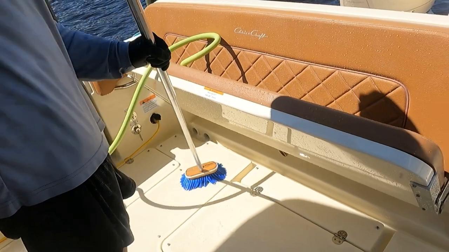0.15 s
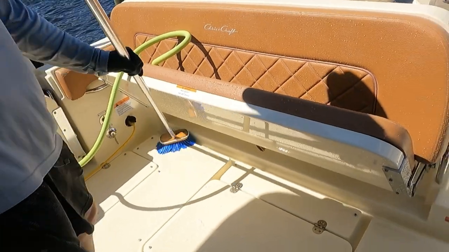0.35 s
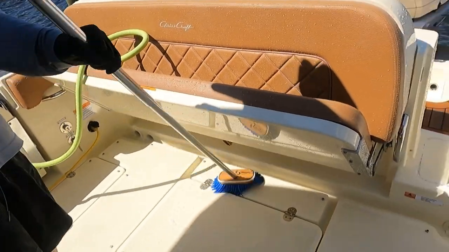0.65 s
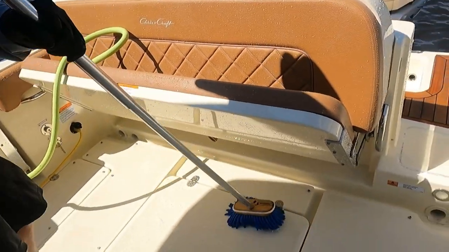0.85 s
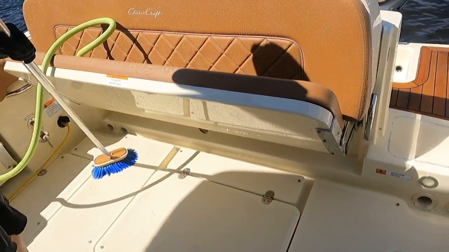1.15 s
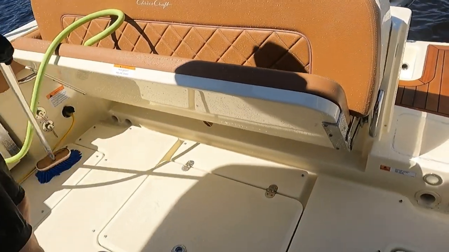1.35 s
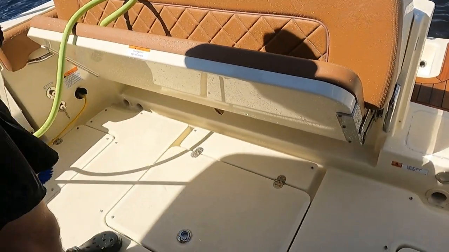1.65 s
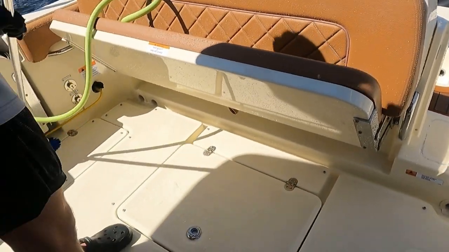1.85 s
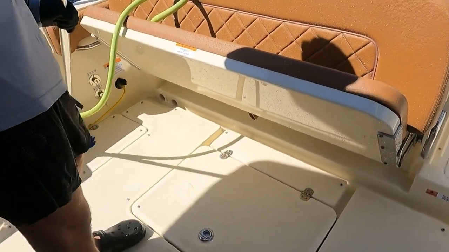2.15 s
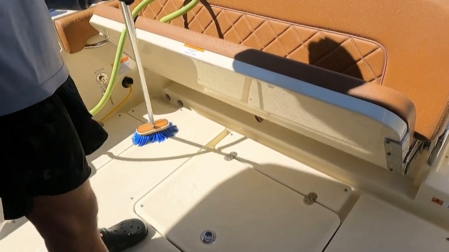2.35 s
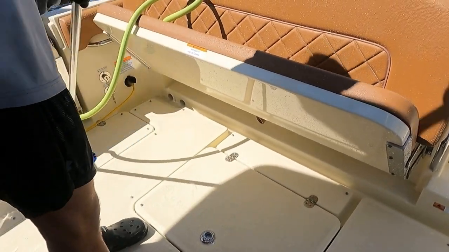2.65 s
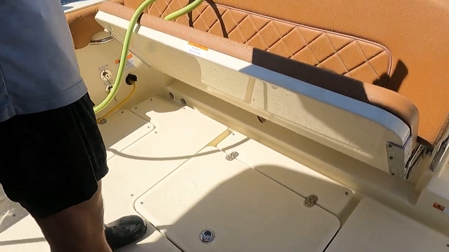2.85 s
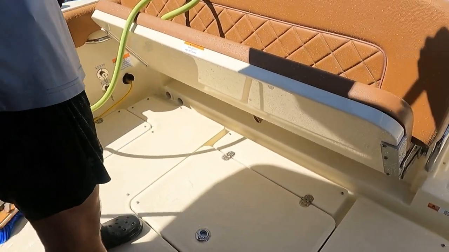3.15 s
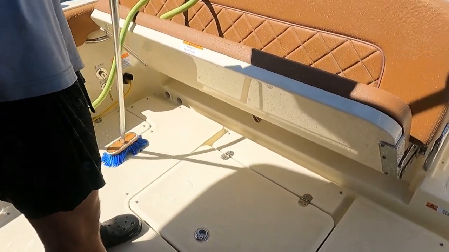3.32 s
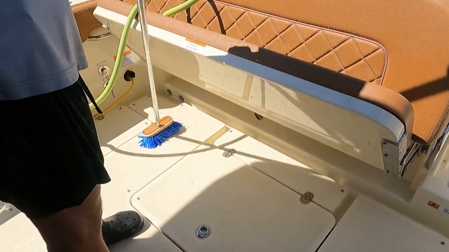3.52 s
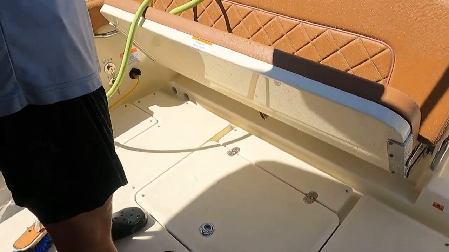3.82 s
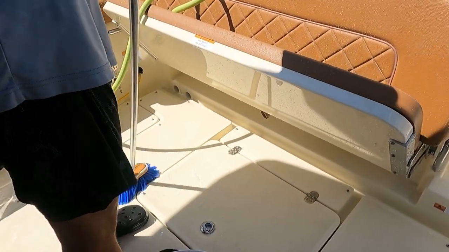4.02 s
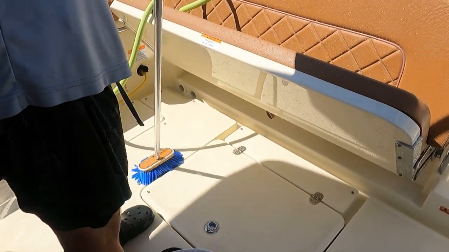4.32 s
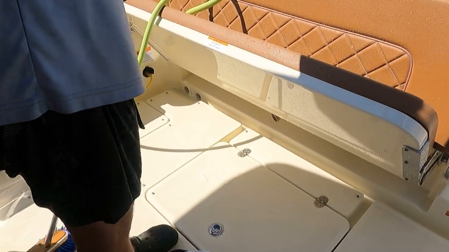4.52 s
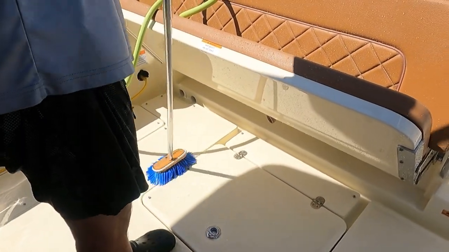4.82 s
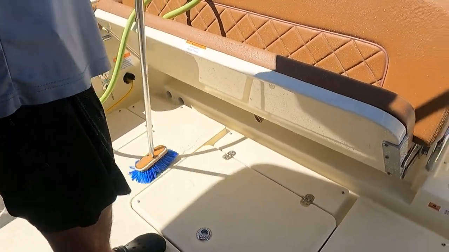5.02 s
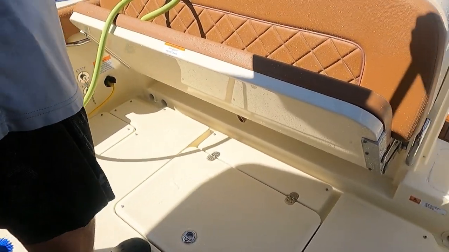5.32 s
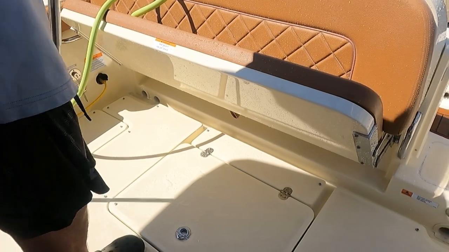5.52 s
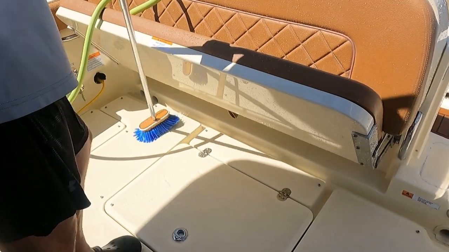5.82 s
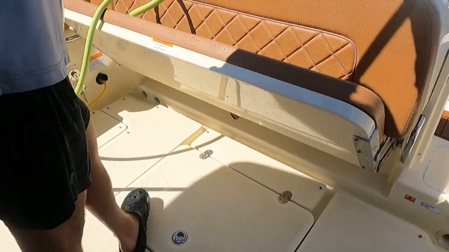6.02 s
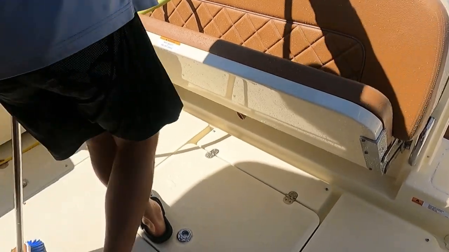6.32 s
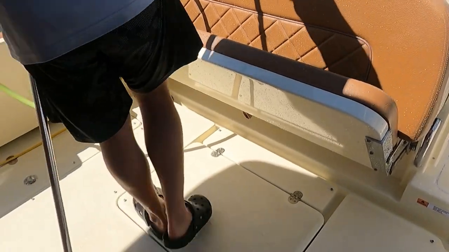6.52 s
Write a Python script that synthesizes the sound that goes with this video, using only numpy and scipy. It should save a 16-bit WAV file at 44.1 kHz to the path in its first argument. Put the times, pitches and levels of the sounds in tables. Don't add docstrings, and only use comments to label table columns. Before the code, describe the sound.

A soft brush scrubs back and forth over a ridged boat deck, hissing and faintly singing, with a hard hull knock and a later clatter.

```python
import sys
import numpy as np
from scipy import signal
from scipy.fft import rfft, irfft, next_fast_len
from scipy.io import wavfile
from scipy.ndimage import uniform_filter1d

SR = 44100
rng = np.random.default_rng(int(sys.argv[2]) if len(sys.argv) > 2 else 0)


def gain_from_db(level_db):
    decades = np.asarray(level_db, float) / 20
    return 10 ** decades


def to_wav(s):
    ch = np.atleast_2d(s).T
    pcm = np.round(np.clip(ch, -1, 1) * 32767)
    wavfile.write(sys.argv[1], SR, pcm.astype(np.int16))


N = 294147

# fastest moment in seconds, speeding up in seconds, slowing down in
# seconds, ridges crossed per second in Hz, tone level in dB.
RIDGE_STROKES = [(0.121, 0.19, 0.17, 1170, -51), (.23, 0.099, 0.35, 857, -44.5),
                 (.615, 0.068, 0.066, 704, -44.5), (1.075, 0.235, 0.21, 949, -44),
                 (3.3, .26, 0.22, 1118, -48.5), (3.69, 0.18, 0.18, 1110, -44),
                 (4.05, 0.15, 0.23, 963, -42.5), (4.43, 0.16, 0.18, 1091, -41.5),
                 (4.765, 0.14, 0.23, 1039, -41.5), (5.16, .18, 0.2, 1035, -41),
                 (5.63, 0.21, 0.24, 1088, -42), (5.99, 0.18, 0.23, 974, -47.5),
                 (6.42, 0.21, 0.15, 812, -55), (2.33, .2, 0.054, 1140, -52), (2.72, 0.19, 0.33, 1086, -53),
                 (.67, .2, 0.19, 1138, -47.5), (2.7, .2, 0.24, 1368, -52.5)]
ARM_SWINGS = [(2.4, 2.4, 1), (2.4, 2.4, 1), (2.4, 2.4, 1), (2.2, 4.5, .5), (3.4, 3, .6), (2.4, 2.4, 1),
              (2.4, 2.4, .9), (2.4, 3, 1.1), (2.4, 2.4, .9), (2.4, 2.4, 1.1), (2.4, 2.4, .75),
              (2.4, 2.4, 1.5), (2.4, 2.4, 1), (2.4, 2.4, 1), (2.4, 2.4, 1), (2.4, 2.4, 1), (2.4, 2.4, 1)]


def evened(x):
    return x / np.sqrt(np.mean(x ** 2) + 1e-20)


def read(points, hz):
    f, value = np.transpose(points)
    return np.interp(np.log(hz + 1), np.log(f + 1), value)


def add(mix, s, sound):
    part = mix[round(s * SR):][:len(sound)]
    part += sound[:len(part)]


def drift(count, span):
    wide = max(int(span), 1)
    wander = uniform_filter1d(rng.standard_normal(count), wide)
    return evened(uniform_filter1d(wander, wide))


def resonate(x, hz, width):
    turn = np.exp(2j * np.pi * hz * np.arange(len(x)) / SR)
    r = np.exp(-np.pi * width / SR)
    return 2 * (turn * signal.lfilter([1 - r], [1, -r], x / turn)).real


def coloured(x, points):
    size = next_fast_len(len(x))
    gain = gain_from_db(read(points, np.fft.rfftfreq(size, 1 / SR)))
    return evened(irfft(rfft(x, size) * gain, size)[:len(x)])


def speed(t, fastest, speeding, slowing, square):
    length = np.where(t < fastest, speeding, slowing)
    return np.maximum(1 - abs((t - fastest) / length) ** square, 0)


def comb(hz, t):
    *swing, top_hz, db = np.transpose(RIDGE_STROKES)[:, :, None]
    early_square, late_square = np.transpose(ARM_SWINGS)[:2, :, None]
    pace = speed(t, *swing, np.where(t < swing[0], early_square, late_square))
    firm = np.clip((pace - .65) / .25, 0, 1) * np.clip((db + 54) / 9, 0, 1)
    best = firm.argmax(0), np.arange(len(t))
    order = np.maximum(hz[:, None] / np.maximum((top_hz * pace)[best], 300), .5)
    under_db = -3.5 * np.clip(4 - 5 * order, 0, 1)
    reach = np.clip(np.minimum(hz / 300 - 1, 2 - 1.46 * hz / 3400), 0, 1)
    return firm[best] * (3.5 * np.cos(2 * np.pi * order) + under_db) * reach[:, None]


def hiss(spread_db=1.5, patchy_db=1.5, flicker_db=0.5):
    # fastest moment in seconds, speeding up in seconds, slowing down in seconds, bristle hiss in dB,
    # deck boom relative to it in dB.
    strokes = [(.15, 0.45, 0.19, -39.5, 3), (.33, 0.2, 0.092, -41, 2), (0.631, 0.19, 0.21, -40, -3.5),
               (1.1, 0.3, 0.24, -40, 0), (1.33, 0.072, 0.066, -51.5, 5), (1.481, 0.14, 0.11, -46, 0),
               (1.76, 0.15, 0.11, -45.5, 3.5), (2.005, 0.01, 0.013, -66, -10),
               (2.11, 0.031, 0.027, -56.5, 10), (2.25, 0.09, 0.12, -46.5, -2),
               (2.41, 0.12, 0.057, -44.5, -1), (2.53, 0.081, 0.031, -52.5, -2),
               (2.732, 0.17, 0.19, -41.5, -5), (2.97, 0.19, 0.17, -53.5, 2.5),
               (3.23, 0.21, 0.28, -42.5, -8), (3.42, 0.073, 0.062, -41.5, -2),
               (3.67, 0.18, 0.21, -40.5, -2), (4.07, .19, 0.17, -39, 0.5), (4.44, 0.17, 0.17, -40, -1),
               (4.791, 0.18, .2, -39.5, 2), (5.16, 0.17, 0.23, -41, 1), (5.64, 0.26, 0.29, -41, -3.5),
               (5.99, 0.15, 0.29, -43, -5), (6.442, 0.26, 0.18, -45.5, -1), (6.72, 0.12, .1, -47.5, -3)]
    # frequency in Hz, density in dB per Hz.
    bristles = [(200, -18), (380, -16), (700, -12.5), (1030, -5.5), (1800, 4), (3380, 1), (6000, -8),
                (8300, -13), (9200, -22.5), (10200, -20.5), (11200, -29.5), (12200, -26), (14000, -30),
                (15600, -35)]
    # time in seconds, gain at the top in dB.
    shadow = [(0, -45), (.42, -40), (.52, -10), (.62, -9), (.7, 0), (.8, 5), (1.8, -4), (2.3, 2), (2.6, 1),
              (5.9, 0), (6.67, 7)]
    flicks = rng.standard_normal(N) * gain_from_db(spread_db * np.minimum(rng.exponential(1, N), 5))
    hz, t, z = signal.stft(coloured(flicks, bristles), SR, nperseg=256, noverlap=192)
    *swing, top_db, boom_db = np.transpose(strokes)[:, :, None]
    pace = speed(t, *swing, 2.11)
    boom_lift_db = boom_db + 3.5 - 5.5 * pace ** 4
    laws = [(boom_lift_db, 1, -66, 430, 1200),
            (4, 0.98, -60.5, 1300, 3500),
            (0, 1, -64.5, 3600, 8000)]
    field = np.zeros(z.shape)
    for (lift_db, power, rest_db, lo, hi), centre in zip(laws, np.eye(3)):
        energy = ((gain_from_db(top_db + lift_db) * pace ** power) ** 2).sum(0) + gain_from_db(rest_db) ** 2
        level_db = 10 * np.log10(uniform_filter1d(energy, size=35))
        band = z[(hz > lo) & (hz < hi)]
        share_db = 10 * np.log10(2 * (abs(band) ** 2).sum(0).mean())
        weight = np.interp(hz, [900, 1500, 3000, 4500], centre[[0, 1, 1, 2]])
        field += weight[:, None] * (level_db - share_db)
    top = np.clip((hz - 10000) / 5000, 0, 1) ** 2
    field += np.outer(top, np.interp(t, *np.transpose(shadow)))
    patches = uniform_filter1d(rng.standard_normal(z.shape), 4, 0)
    patches = evened(uniform_filter1d(patches, 30, 1))
    field += patchy_db * np.clip(patches, -2, 2) * np.clip(hz / 1500, .3, 1)[:, None]
    field += flicker_db * drift(count=len(t), span=5.5) - 3.0 + comb(hz, t)
    return signal.istft(z * gain_from_db(field), SR, nperseg=256, noverlap=192)[1][:N]


def wind():
    # crest in seconds, length in seconds, buffet in dB, flutter in dB.
    gusts = [(0.0, 0.039, -20, -26), (0.155, 0.12, -31, -36.5), (0.665, 0.083, -32, -36),
             (0.864, .05, -35, -49), (0.919, 0.043, -24.5, -29), (1.027, 0.056, -42, -35),
             (1.135, 0.11, -44, -37.5), (1.25, 0.037, -41, -48), (1.324, 0.07, -26, -30.5),
             (1.643, .03, -41, -53), (1.885, 0.06, -42, -26), (2.207, 0.07, -39, -48),
             (2.31, 0.036, -43, -26), (2.355, 0.033, -28.5, -38.5), (2.567, 0.029, -35.5, -57),
             (2.76, 0.04, -48, -33.5), (2.912, 0.064, -36.5, -39.5), (3.242, 0.077, -35, -35.5),
             (3.85, .15, -46.5, -58), (4.035, 0.051, -35.5, -32.5), (4.235, 0.047, -35.5, -36.5),
             (4.49, 0.099, -40, -35), (4.675, .06, -52, -44), (4.823, .11, -36, -34),
             (5.15, 0.097, -40, -44), (5.463, 0.17, -37.5, -37), (5.9, 0.05, -35.5, -37),
             (6.17, 0.04, -26, -28), (6.367, 0.12, -41, -40.5), (6.54, 0.24, -37, -57),
             (6.67, 0.053, -39.5, -28.5)]
    # frequency in Hz, density in dB per Hz.
    buffet_colour = [(12, 13.5), (30, 15), (60, 14.5), (85, 0), (130, -49)]
    # frequency in Hz, density in dB per Hz.
    flutter_colour = [(50, -28), (85, 10), (120, 4.5), (180, 0.5), (300, -8.5), (450, -86)]
    s, length, buffet_db, flutter_db = np.transpose(gusts)[:, :, None]
    t = np.arange(0, N / SR + .01, .005)
    fall_db = -7.5 * abs(t - s) / length

    def gusting(db, calm_db):
        power = (gain_from_db(db + fall_db) ** 2).sum(0) + gain_from_db(calm_db) ** 2
        return np.interp(np.arange(N) / SR, t, np.sqrt(power))

    lumps = gain_from_db(2 * np.clip(-drift(count=N, span=1100), -2, 1.3))
    low = coloured(rng.standard_normal(N), buffet_colour)
    high = coloured(rng.standard_normal(N), flutter_colour)
    return gusting(buffet_db, -45.5) * low + gusting(flutter_db, -46.5) * high * lumps


def harbour(waver=0.01996, swell_db=2.5):
    # frequency in Hz, level in dB.
    drone = [(160, -52), (224, -53), (250, -53.5), (313, -52)]
    # frequency in Hz, density in dB per Hz.
    air = [(100, -4), (200, 3), (330, -1), (420, -11), (1400, -34.5), (3000, -70)]
    # frequency in Hz, density in dB per Hz.
    air_top = [(3000, -40), (8000, -52), (11500, -70), (15600, -88)]
    # time in seconds, level in dB.
    wash = [(0.0, -42), (1.04, -47.5), (1.36, -43.5), (1.56, -43.5), (2.08, -47.5), (2.56, -47.5),
            (2.79, -44), (2.88, -45.5), (4.42, -45), (4.57, -45), (5.52, -46), (6.02, -44), (6.2, -48),
            (6.43, -44), (6.58, -49), (6.67, -37.5)]
    air_db = -48.5
    out = gain_from_db(air_db) * coloured(rng.standard_normal(N), air) * gain_from_db(2.7 * drift(count=N, span=850))
    treble = [(1000, -60), (1500, -40)] + air_top
    out += gain_from_db(air_db - 40) * coloured(rng.standard_normal(N), treble)
    for hz, db in drone:
        turns = np.cumsum(hz * (1 + waver * np.clip(drift(count=N, span=2090), -2, 2))) / SR
        level = gain_from_db(db + swell_db * np.clip(drift(count=N, span=1240), -2, 1))
        out += level * np.sqrt(2) * np.sin(2 * np.pi * turns)
    return out * gain_from_db(np.interp(np.arange(N) / SR, *np.transpose(wash)) + 46)


def flick(s, db, hz, width, t60):
    t = np.arange(SR // 3) / SR
    puff = rng.standard_normal(len(t)) * gain_from_db(2.7 * drift(count=len(t), span=90))
    puff = resonate(resonate(puff, hz, width), hz, width)
    puff = evened(resonate(resonate(puff, 0, 2 * (hz + width)), 0, 3 * (hz + width)))
    onset = (1 - np.exp(-t / (0.0012 + 0.025 * t60 ** 3))) ** 2
    return s, gain_from_db(db - 60 * t / t60) * puff * onset


def flicks_and_rubs(mix):
    # start in seconds, level in dB, centre in Hz, width in Hz, t60 in seconds.
    seams = [(0.61, -34, 1240, 2500, 0.44), (1.826, -19.5, 415, 302, 0.25), (1.824, -37, 1030, 1600, 0.27),
             (1.936, -41.5, 990, 1200, 0.13), (1.993, -42, 1750, 600, 0.084),
             (1.993, -51, 4700, 5600, 0.11), (2.093, -54.5, 2480, 4000, .12),
             (2.168, -28.5, 360, 297, 0.31), (2.169, -36.5, 810, 850, 0.35), (2.17, -39, 2030, 780, 0.088),
             (2.25, -42, 605, 300, 0.49), (3.435, -39.5, 720, 600, 0.14), (4.89, -39, 590, 460, 0.19),
             (.17, -37, 610, 300, 0.13), (0.59, -35, 4150, 3240, 0.56), (1.827, -26, 577, 180, 0.18),
             (2.301, -34, 1120, 65, 0.11), (2.721, -29, 1600, 3400, 0.25), (2.84, -35, 810, 1200, 0.094),
             (3.25, -35.5, 1100, 2100, 0.21), (4.503, -33, 705, 1000, 0.19), (4.53, -31.5, 550, 600, 0.16),
             (0.0, -30, 800, 1200, .06), (0.0, -48, 9000, 9000, .05), (5.783, -38, 1700, 2500, .3),
             (5.797, -54, 11500, 5000, .08), (2.17, -35, 700, 900, .08), (.585, -37, 1000, 1300, 0.38),
             (5.7954, -18.5, 1730, 2460, 0.086), (6.128, -36, 1490, 3800, 0.31),
             (6.33, -37.5, 1580, 800, 0.8)]
    # start in seconds, level in dB, centre in Hz, width in Hz,
    # t60 in seconds.
    more_flicks = [(6.128, -58, 11000, 5000, .08), (.612, -36, 2200, 2500, .1), (2.745, -37, 1500, 1700, .08),
                   (2.185, -46, 1300, 1200, .15), (1.825, -37, 2100, 900, .06),
                   (1.838, -41, 1650, 1300, 0.27), (3.935, -44, 580, 110, .15), (4.22, -46.5, 530, 200, 0.18),
                   (5.46, -44.5, 570, 200, 0.16), (6.4, -43, 550, 180, 0.23), (3.23, -41, 600, 440, .2),
                   (2.17, -33, 337, 150, .25), (3.78, -39, 2200, 900, 0.23), (4.49, -39, 2200, 1500, 0.23),
                   (.6, -38, 3000, 1600, .2), (1.845, -45, 2200, 1600, .15), (2.73, -35, 990, 500, .15),
                   (2.6, -44.5, 950, 400, 0.66), (0.55, -40, 950, 350, 0.22), (.18, -35, 1150, 500, 0.51),
                   (4.84, -41, 2000, 1600, .4)]
    for row in seams + more_flicks:
        add(mix, *flick(*row))


def thump(s, db, hz, t60, cycles=0.48):
    t = np.arange(SR // 2) / SR
    onset = 1 - np.exp(-t * hz / cycles)
    return s, gain_from_db(db - 60 * t / t60) * np.sin(2 * np.pi * hz * t) * onset


def thumps(mix):
    # start in seconds, peak in dB, frequency in Hz, t60 in seconds.
    blows = [(5.812, -16.5, 107, 0.2), (0.969, -24.5, 95, 0.23), (0.0173, -15.5, 90.5, .05),
             (1.585, -21, 85.5, 0.083), (1.961, -21, 45.3, 0.21), (2.097, -17.5, 207, 0.11),
             (2.097, -21, 258, 0.086), (2.263, -36, 110, .08), (2.293, -11.5, 71.6, 0.099),
             (2.31, -17, 38.8, 0.24), (6.125, -31, 60, .04), (6.134, 2, 85, 0.025),
             (6.153, -12.5, 49.2, 0.26), (6.183, -11.5, 49.5, 0.099), (6.597, -15, 65.9, 0.18),
             (6.647, -10.5, 56.3, 0.37), (6.618, -19, 138, 0.13), (6.65, -15, 128, 0.11)]
    # start in seconds, peak in dB, frequency in Hz, t60 in seconds, rise in cycles.
    first_touch = (1.8257, 1, 480, .02, .6)
    for row in blows + [first_touch]:
        add(mix, *thump(*row))


def singing(fastest, speeding, slowing, top_hz, db, second_db, third_db, late_db,
            early_square, square, early_loss, slip=.021, spread=.015, uneven_db=3.5):
    # time in seconds, length in seconds,
    # gain of the first tone in dB.
    catches = [(0.275, 0.035, 1.5), (1.09, .03, 1), (1.17, 0.032, 3), (3.423, 0.031, 11.5),
               (3.636, 0.027, 7.5), (3.804, 0.026, 7), (4.006, 0.015, 5), (4.197, 0.02, -3),
               (4.372, 0.016, 6), (4.414, 0.02, -7), (4.498, 0.02, 8), (4.75, 0.032, 5), (4.86, 0.028, -12),
               (5.2, 0.02, 6.5), (5.227, 0.0098, -10), (5.305, 0.023, 2), (5.693, 0.02, 4.5),
               (5.974, 0.012, 6.5)]
    slow_loss_db = [-34, -24, -28]
    breaks_db = [3.0, 5.0, 5.0, 5.0]
    t = fastest + np.arange(-SR // 2, SR // 2) / SR
    pace = speed(t, fastest, speeding, slowing, np.where(t < fastest, early_square, square))
    lost_speed = (1 - pace) * np.where(t > fastest, 1.7, early_loss)
    first_db = late_db * (t - fastest) / (speeding + slowing) * 2
    for s, length, gain_db in catches:
        first_db = first_db + gain_db * np.exp(-.5 * ((t - s) / length) ** 2)
    tones_db = [first_db, second_db, third_db, third_db - 13]
    heights = []
    for tone_db, loss_db, break_db in zip(tones_db, slow_loss_db + slow_loss_db[-1:], breaks_db):
        breaking_db = break_db * np.clip(drift(count=len(t), span=710), -2, 1)
        heights.append(gain_from_db(db + tone_db + loss_db * lost_speed + breaking_db))
    out = np.zeros(len(t))
    for start, side in zip(rng.random(5), np.linspace(-1, 1, 5)):
        rate = top_hz * pace * (1 + spread * side + slip * drift(count=len(t), span=371))
        turns = start + np.cumsum(rate) / SR
        ticks = sum(height * np.cos(2 * np.pi * k * turns) for k, height in enumerate(heights, 1))
        out += ticks * gain_from_db(uneven_db * drift(count=len(t), span=148))
    out *= gain_from_db(-1.5) * np.clip((pace - 0.47) / 0.064, 0, 1)
    return max(t[0], 0), out[t >= 0]


def singing_strokes(mix):
    # second tone in dB, third tone in dB, gain of the first tone from early to late in dB.
    voices = [(-5, -16, 4), (-7, -12, -12), (-14, -3, 12), (-11, -9, 6), (-5, -9, 4), (-5, -7.5, 4),
              (-7, 0, 3), (-6, -6.5, -0.5), (-10, -4.5, 3), (-10.5, -7.5, 11), (-6.5, -3, 2), (-5, -1.5, 1),
              (0, -4, 12), (-19, -6, -1), (-20, -9, 2), (-20, -21, 2), (-26, -12, 9)]
    for row, voice, swing in zip(RIDGE_STROKES, voices, ARM_SWINGS):
        add(mix, *singing(*row, *voice, *swing))


def knock(modes, s, db, contact_ms, ring, lag=0.0784, cycles=0.67):
    t = np.arange(SR // 2) / SR
    hz, level_db, t60 = np.transpose(modes)[:, :, None]
    since = np.maximum(t - lag * (1 / np.sqrt(hz) - 1 / np.sqrt(hz.max())), 0)
    swell = 1 - np.exp(-since * hz / cycles)
    decay = gain_from_db(level_db - 60 * since / (t60 * ring))
    body = (decay * swell * np.sin(2 * np.pi * hz * since)).sum(0)
    push = np.sin(np.pi * np.clip(t[:400] * 1000 / contact_ms, 0, 1))
    radiated = signal.butter(2, [70, 10500], "band", fs=SR)
    sound = signal.lfilter(*radiated, signal.oaconvolve(body, push))
    return s, gain_from_db(db) * sound / abs(sound).max()


def hull_knocks(mix):
    # frequency in Hz, level in dB, t60 in seconds.
    hull_modes = [(150, -18, .15), (209.6, -7, .1), (264, -4, .11), (319, -13, .2), (400, -10, .08),
                  (475, -13, .055), (521, -13.5, .076), (575, -12.5, .036), (765, -30, .12), (950, -25, .1),
                  (1040, -28, .1), (2050, -36, .05), (1270, -32, .1)]
    # start in seconds, blow in dB, contact in ms, ring length as a factor.
    taps = [
        (1.8375, -23, 1.1, 0.37),
        (1.864, -23.5, 0.86, 0.9),
        (1.335, -23, 2.26, 0.42),
        (2.094, -26.5, 1.16, 1.2),
        (1.6, -42, 5.8, 0.73),
    ]
    # start in seconds, blow in dB, contact in ms, ring length as a factor.
    hard_knock = (1.8279, -3.5, .5, 1.1)
    for row in taps + [hard_knock]:
        add(mix, *knock(hull_modes, *row, lag=0, cycles=.47))


def latch_clatter(mix):
    # frequency in Hz, level in dB, t60 in seconds.
    latch_modes = [(107, 3.5, 0.11), (196.5, 6.5, 0.084), (286, 8, 0.057), (595, 4, 0.11),
                   (655, -1.5, 0.14), (964, -2.5, 0.079), (1200, -10, 0.18), (1350, -1, 0.087),
                   (1542, -1.5, 0.097), (1844, -1, .08), (2380, 5, 0.019), (3410, -4.5, 0.059),
                   (4700, -16, .03), (8500, -2, 0.15), (9800, -3, .07)]
    # frequency in Hz, level in dB, t60 in seconds.
    plate_modes = [(247.4, 5.5, 0.082), (416, -8.5, 0.11), (890, -13, 0.089), (1053, -4.5, .1),
                   (1920, -21, 0.066), (2770, -4, .04), (3080, -8, .04), (4100, -18, .03), (8700, -5, .07),
                   (9200, -10, .04)]
    # start in seconds, blow in dB, contact in ms, ring length as a factor.
    clatter = [
        (5.7927, -25, 0.16, 0.45),
        (5.796, -8.5, 0.22, 0.86),
        (5.799, -34, 0.39, 1.),
        (5.803, -11.5, 0.53, 0.8),
        (5.807, -10.5, 0.77, 0.59),
        (5.812, -12.5, 0.47, 0.99),
        (5.822, -18, 0.65, 0.65),
    ]
    for row in clatter:
        add(mix, *knock(latch_modes + plate_modes, *row))


def scene():
    mix = hiss() + wind() + harbour()
    flicks_and_rubs(mix)
    thumps(mix)
    singing_strokes(mix)
    hull_knocks(mix)
    latch_clatter(mix)
    return mix[None]


def low_pass(x):
    return signal.sosfilt(signal.butter(12, 15640, fs=SR, output="sos"), x)


def record(dry):
    fade = np.minimum(np.arange(N)[::-1] / 250, 1)
    ceiling = .9
    mix = dry * fade / (1 + (dry / ceiling) ** 6) ** (1 / 6)
    return low_pass(mix)


dry = scene()
out = record(dry)
to_wav(out)
```